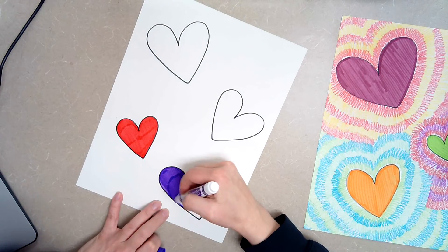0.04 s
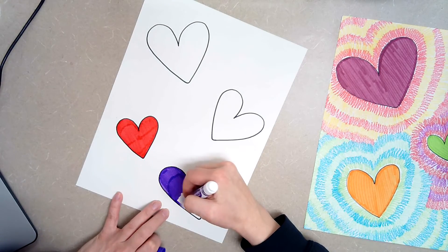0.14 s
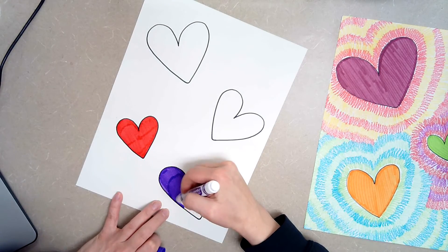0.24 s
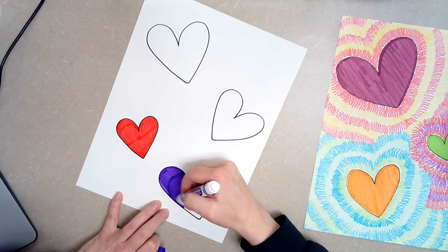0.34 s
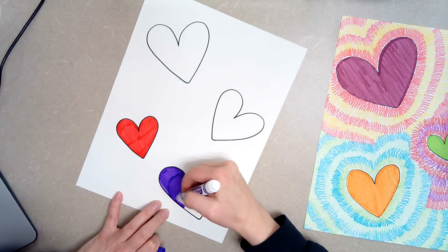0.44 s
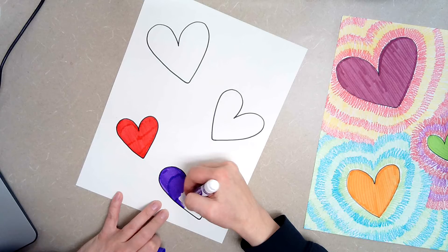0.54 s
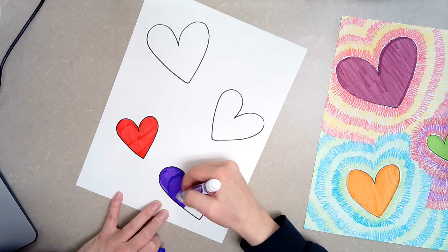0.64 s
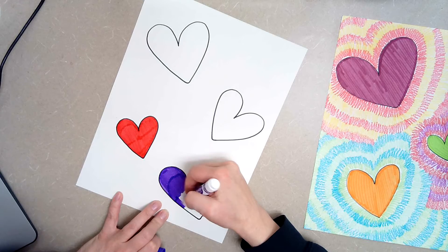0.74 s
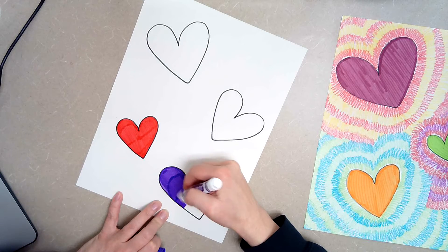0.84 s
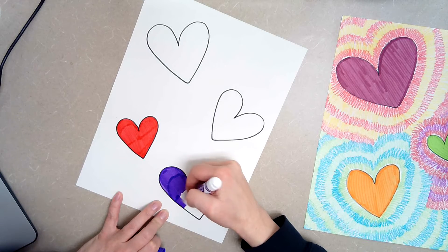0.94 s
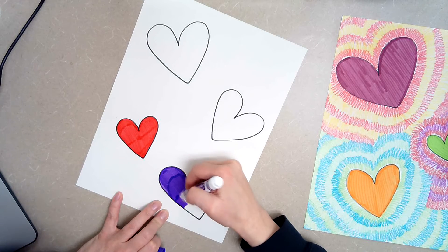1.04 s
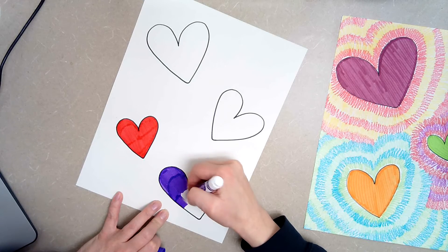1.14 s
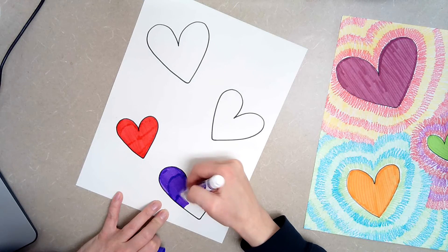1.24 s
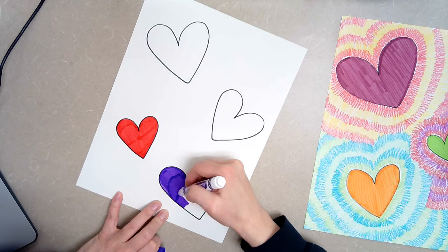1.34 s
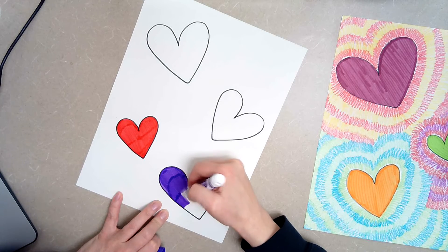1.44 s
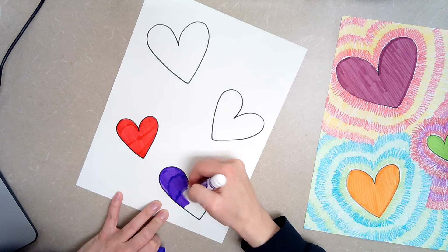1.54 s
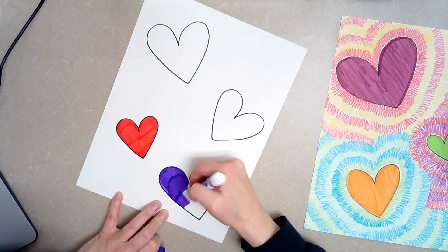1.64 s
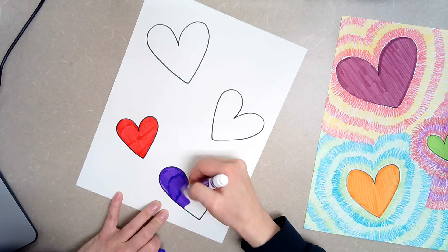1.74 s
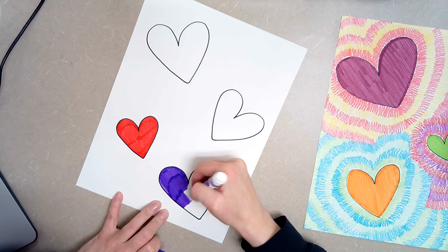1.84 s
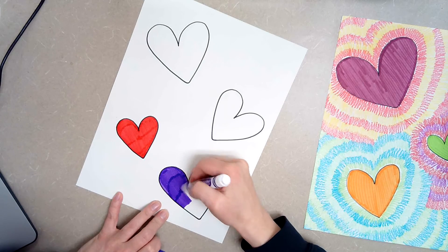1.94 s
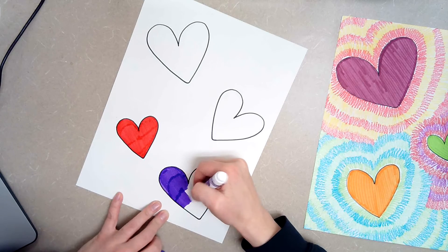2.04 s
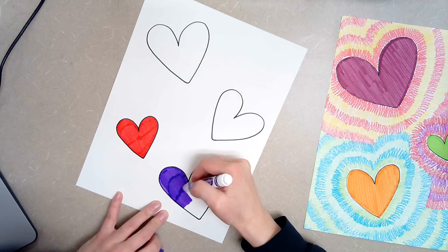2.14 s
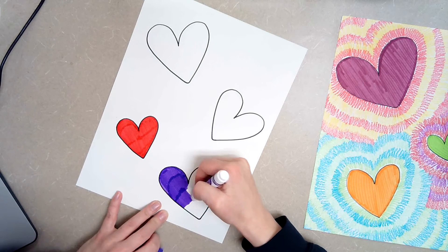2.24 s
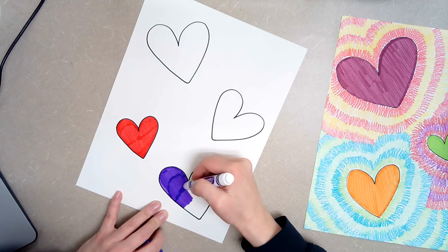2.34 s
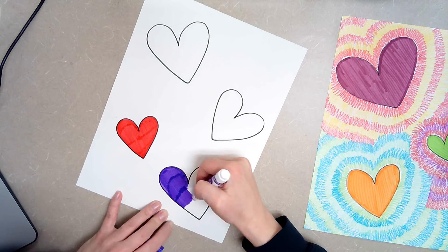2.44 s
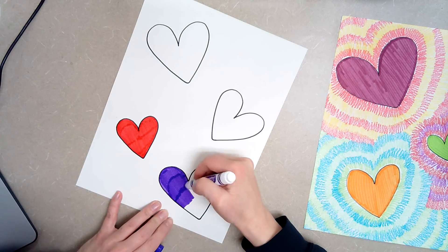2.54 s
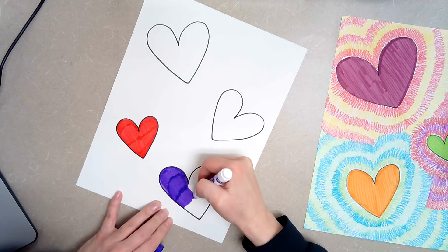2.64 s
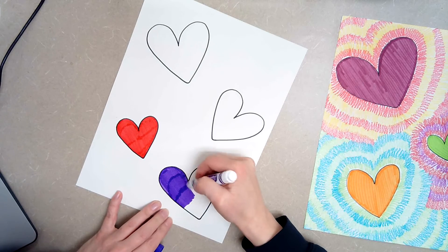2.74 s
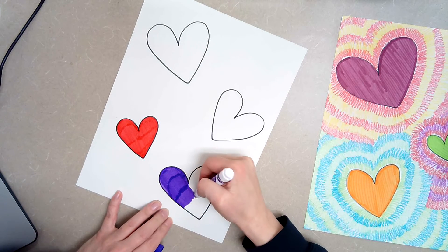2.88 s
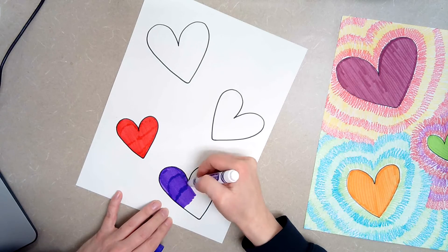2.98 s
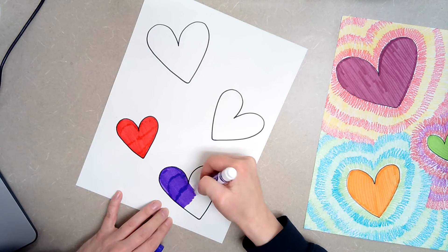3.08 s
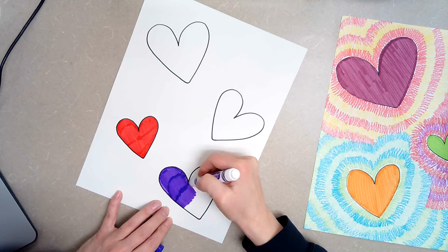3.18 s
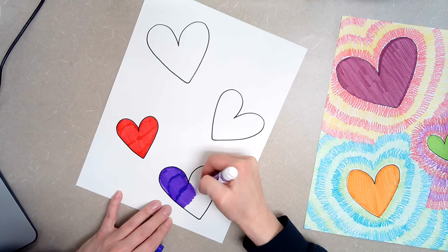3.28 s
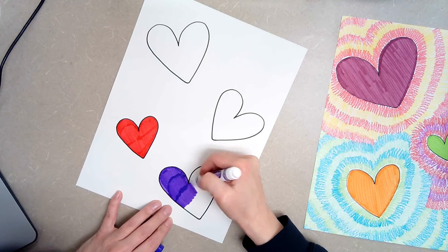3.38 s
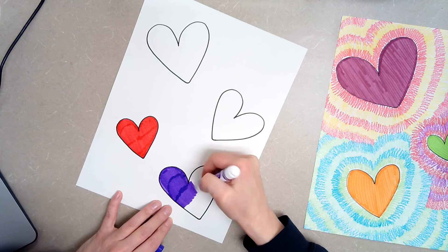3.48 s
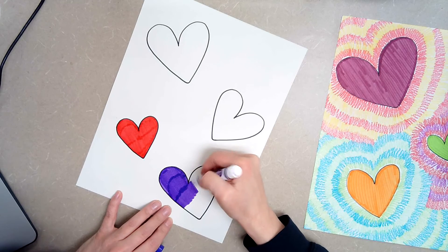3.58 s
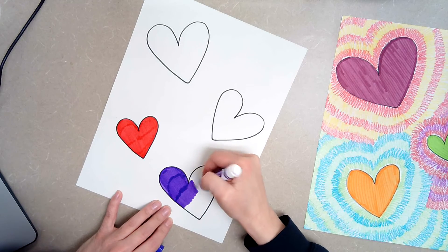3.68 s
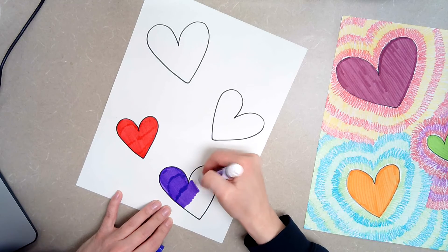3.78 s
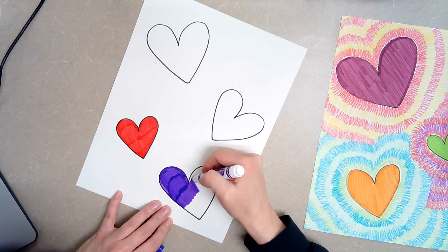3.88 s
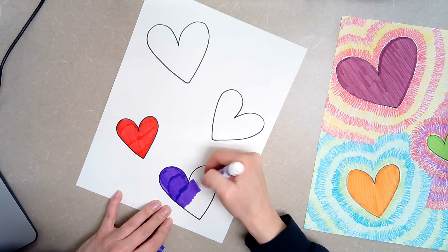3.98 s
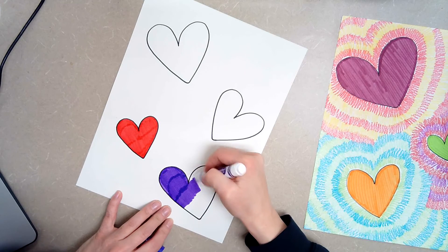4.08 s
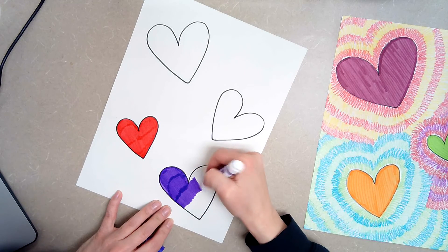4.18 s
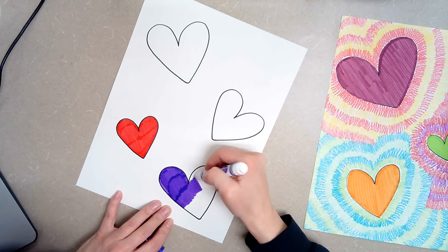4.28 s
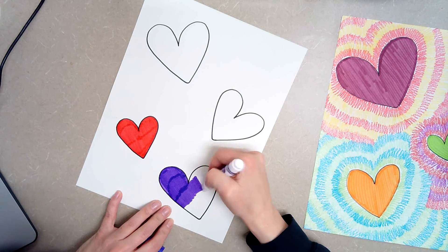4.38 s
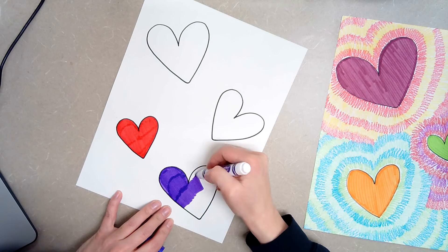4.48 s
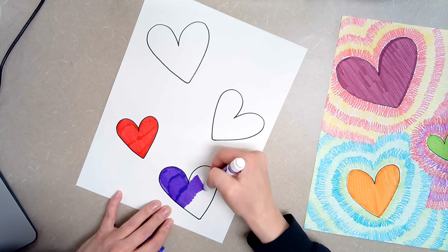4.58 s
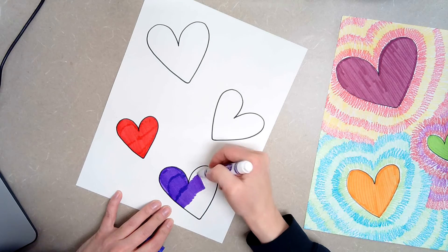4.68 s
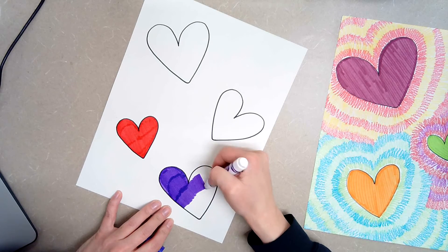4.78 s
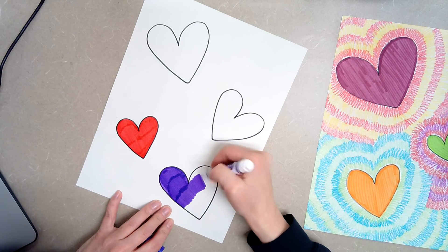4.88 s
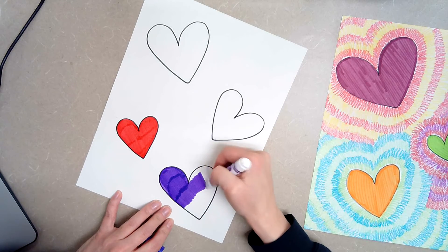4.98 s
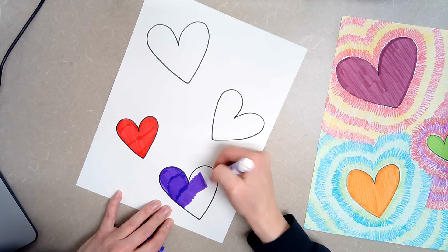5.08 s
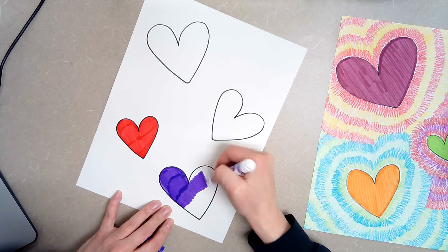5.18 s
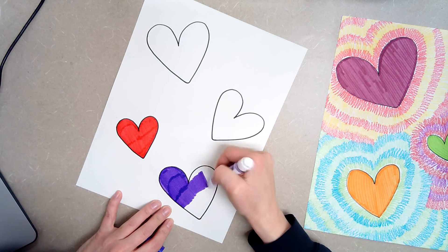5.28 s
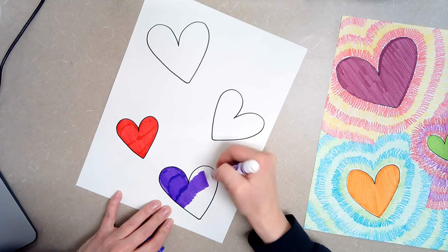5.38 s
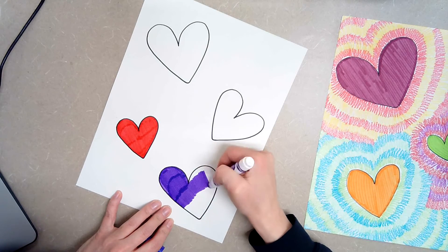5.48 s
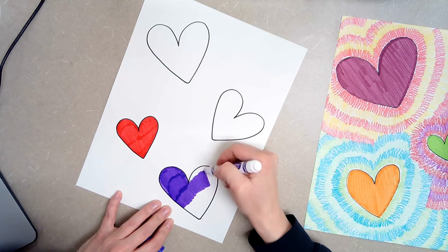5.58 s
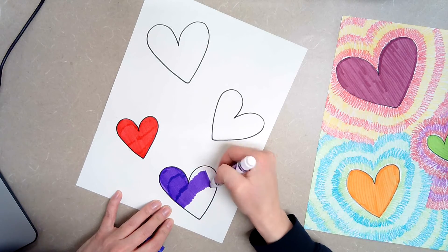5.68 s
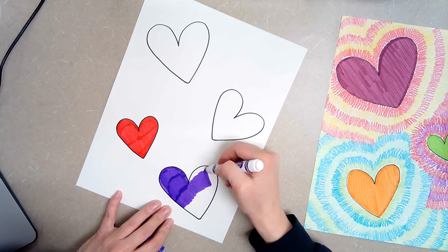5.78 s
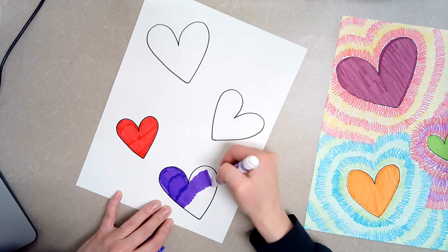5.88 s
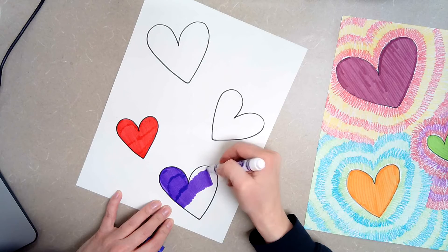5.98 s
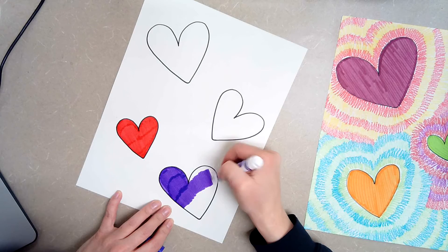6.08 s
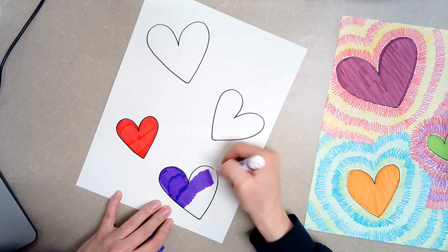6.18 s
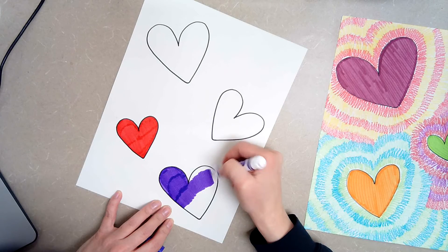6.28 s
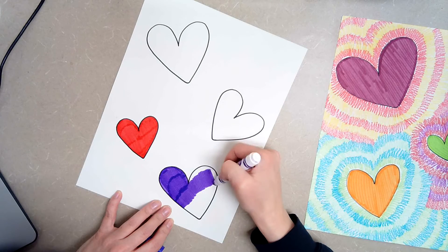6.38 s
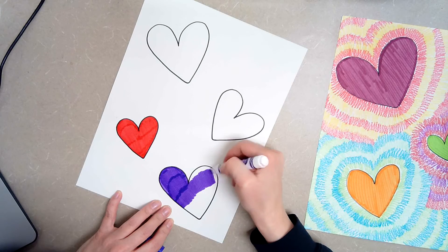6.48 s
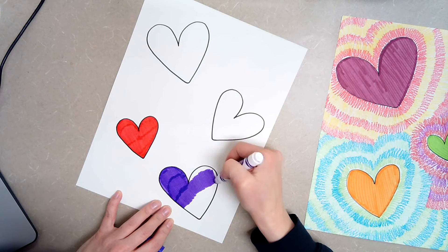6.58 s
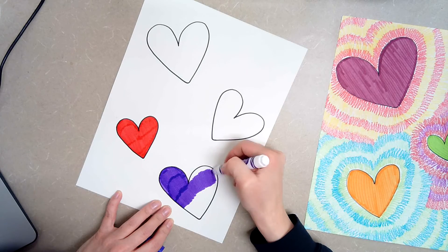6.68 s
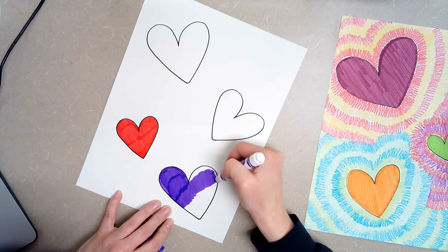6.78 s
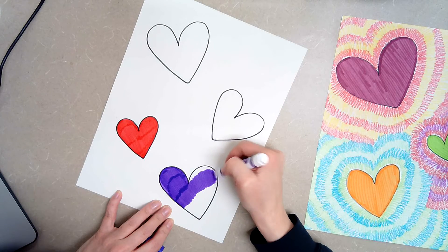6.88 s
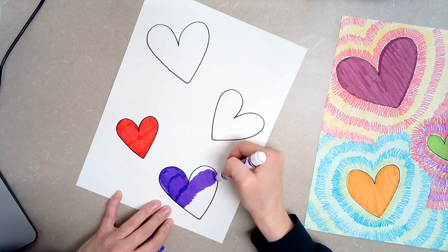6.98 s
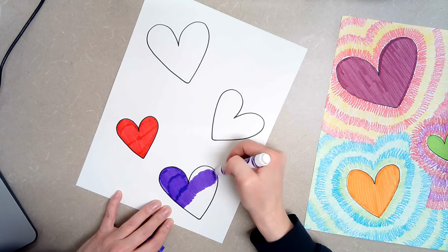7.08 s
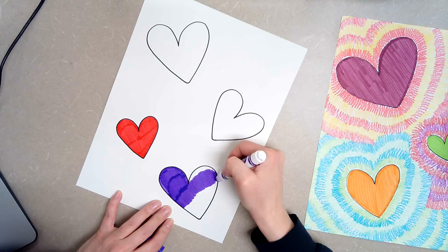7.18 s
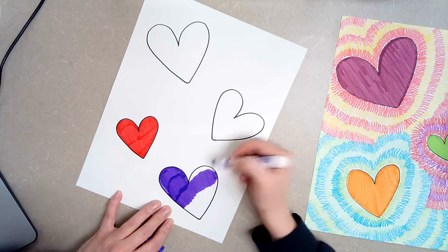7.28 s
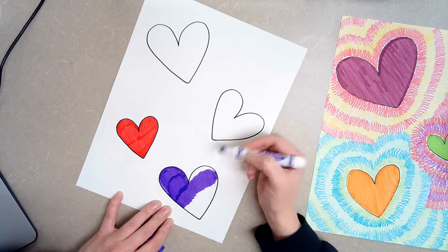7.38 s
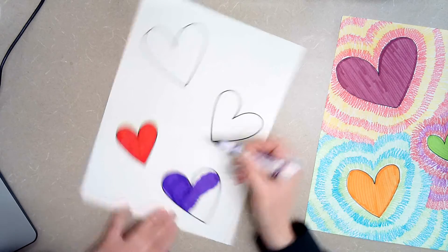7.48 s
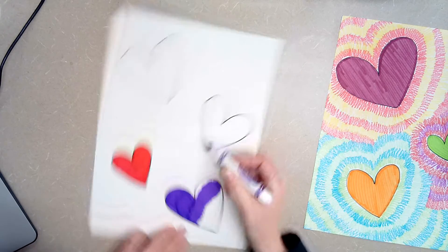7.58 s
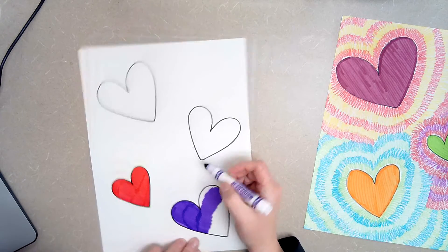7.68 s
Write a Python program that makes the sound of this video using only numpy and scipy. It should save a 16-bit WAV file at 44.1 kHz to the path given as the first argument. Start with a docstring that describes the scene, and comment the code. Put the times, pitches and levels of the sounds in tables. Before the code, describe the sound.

Close up in a quiet room, a felt-tip marker colours in a shape on paper with steady push-and-pull strokes, about five pairs a second, bright, dry and slightly squeaky. The hand rubs the sheet dully and now and then bumps the desk with a soft low tone. The strokes weaken and stop near seven seconds, then the paper slides with a sharp, swelling swish at the very end.

```python
"""In a quiet room a felt-tip marker colours in a shape on a sheet of paper on a desk.
About five push-and-pull pairs of strokes a second catch on the fibres: noise rings in the plastic barrel.
The hand rubs the sheet with dull noise and bumps the desk, which answers with a low, dying tone.
The strokes fade and stop, then the sheet is pulled across the desk with a sharp swish of swelling noise."""
import sys
import numpy as np
from scipy import signal
from scipy.fft import rfft, irfft, next_fast_len
from scipy.io import wavfile
from scipy.ndimage import uniform_filter1d, map_coordinates

SR = 44100
rng = np.random.default_rng(int(sys.argv[2]) if len(sys.argv) > 2 else 0)


def to_wav(s):
    """Save 16-bit WAV."""
    ch = np.atleast_2d(s).T  # columns
    pcm = np.round(np.clip(ch, -1, 1) * 32767)  # PCM
    wavfile.write(sys.argv[1], SR, pcm.astype(np.int16))


N = 340804

# pen strokes, by turns push and pull: start t/s, length/s, base level/dB
STROKES = [(0.062, 0.048, -53), (.138, 0.072, -59.5), (.262, 0.052, -50), (0.343, 0.065, -53),
           (.461, 0.06, -47), (.545, .056, -54.5), (.671, 0.052, -46), (0.748, 0.055, -53),
           (0.869, 0.053, -46.5), (.95, 0.061, -55.5), (1.071, 0.053, -44.5), (1.151, 0.066, -52),
           (1.272, 0.056, -47.5), (1.36, .062, -51), (1.474, 0.057, -47), (1.563, 0.068, -53),
           (1.682, 0.058, -45.5), (1.769, 0.066, -49.5), (1.89, .06, -47.5), (1.978, .065, -51),
           (2.093, 0.063, -46.5), (2.186, 0.071, -51), (2.305, 0.061, -46), (2.4, 0.064, -51),
           (2.514, 0.065, -47), (2.603, 0.067, -51), (2.722, 0.065, -45.5), (2.814, 0.067, -48.5),
           (2.937, 0.058, -43.5), (3.024, 0.0741, -51.5), (3.15, 0.068, -45), (3.243, .074, -53),
           (3.376, 0.054, -48), (3.458, .064, -53.5), (3.578, 0.059, -46.5), (3.671, 0.068, -54),
           (3.788, 0.06, -45.5), (3.877, 0.067, -49.5), (3.995, 0.059, -44), (4.086, 0.071, -51.5),
           (4.2, 0.064, -45.5), (4.296, 0.068, -50), (4.413, 0.065, -46.5), (4.517, 0.07, -52),
           (4.632, .061, -47), (4.731, 0.068, -50.5), (4.845, 0.066, -46), (4.951, .068, -52.5),
           (5.066, 0.064, -47.5), (5.171, .067, -55), (5.289, .063, -48.5), (5.39, 0.068, -53),
           (5.505, 0.065, -49), (5.611, 0.072, -56.5), (5.729, 0.063, -49.5), (5.833, 0.07, -53),
           (5.948, .058, -47), (6.047, 0.07, -52.5), (6.166, 0.064, -48), (6.27, 0.071, -56),
           (6.396, 0.058, -50.5), (6.493, 0.066, -54.5), (6.621, .058, -49), (6.715, 0.058, -54.5),
           (6.828, .057, -51), (6.92, 0.049, -63), (7.039, .047, -56), (7.125, 0.045, -71),
           (7.235, 0.051, -70.5), (7.326, 0.039, -70)]
# slow change of colour as the pen crosses the shape:
# t/s, fizz level against the rasp/dB, nib chatter level against the rasp/dB, middle of the nib pitch f/Hz
COLOUR = [(.15, -20, -33, 1940), (.5, -19.5, -24, 1994), (.8, -9.5, -14.5, 2050), (1.15, -9, -21.5, 2163),
          (1.9, -6.5, -17.5, 2152), (2.9, -10, -17, 2135), (3.3, -13, -24.5, 2235), (4.3, -7, -18.5, 2272),
          (5.1, -3.5, -19, 2526), (5.9, -3.5, -11, 2495), (6.6, -1.5, -8, 2510), (6.85, -8.5, -11.5, 2350),
          (7.07, -12, -11, 2384), (7.14, -6, -6, 2355), (7.35, -11, 1.5, 2424)]
# the hand rocks against the desk: t/s, base level/dB
BUMPS = [(0.139, -57.5), (.285, -60), (0.727, -57.5), (.869, -61), (1.338, -56.5), (1.573, -61.5),
         (1.899, -59.5), (2.368, -64), (2.739, -60), (2.899, -57), (3.02, -62), (3.26, -63), (3.417, -62.5),
         (3.689, -54), (4.242, -56), (4.647, -61), (4.958, -59.5), (5.448, -62.5), (6.249, -56),
         (6.507, -62.5)]
DESK_HZ = 133.7  # the lowest mode of the desk top, about which the bumps scatter
LEAD_S = 0.0077  # the nib starts to creep just before a stroke
TAIL_T60 = 0.19  # seconds in which the faint ringing after a stroke falls by 60 dB


def amp(db):
    """Turn decibels into a gain."""
    return 10 ** (np.asarray(db) / 20)


def unit(x):
    """Scale to an rms (average strength) of 1."""
    return x / np.sqrt(np.mean(x ** 2) + 1e-20)


def clock():
    """The time of each sample in seconds."""
    return np.arange(N) / SR


def curves(rows):
    """Join the points of a table by straight lines: one curve for each column after the time."""
    times, *columns = np.transpose(rows)
    return [np.interp(clock(), times, column) for column in columns]


def wobble(rate):
    """A smooth random curve through `rate` random points a second."""
    points = rng.standard_normal(int(N * rate / SR) + 4)
    return map_coordinates(points, [clock() * rate], order=2)


def filtered(x, response):
    """Multiply each frequency of x by response(frequency)."""
    size = next_fast_len(N + 8192)
    hz = np.fft.rfftfreq(size, 1 / SR)
    return irfft(rfft(x, size) * response(hz), size)[:N]


def coloured(x, points):
    """Give x the tone colour drawn by (f/Hz, level/dB) points, at rms 1."""
    f, db = np.transpose(points)
    return unit(filtered(x, lambda hz: amp(np.interp(np.log(hz + 1), np.log(f), db))))


def friction(catch_rate, catch_db):
    """Countless tiny slips, clumped where the fibres catch: noise with a wavering level."""
    return unit(rng.standard_normal(N) * amp(catch_db * wobble(catch_rate)))


def resonance(centre_hz, width_hz):
    """Noise of rms 1 in a steep-sided resonance whose centre may glide."""
    edge_hz = np.clip(width_hz / 2, 2, SR / 4)
    lowpass = signal.butter(3, edge_hz, fs=SR, output="sos")
    a, b = signal.sosfilt(lowpass, rng.standard_normal((2, N)))
    # slow noise on a cosine and a sine sits as a band around their frequency
    phase = 2 * np.pi * np.cumsum(centre_hz * np.ones(N)) / SR
    return unit(a * np.cos(phase) + b * np.sin(phase))


def patchy(x, depth_db, size):
    """Narrow ridges come and go in the spectrum as the contact point moves; the total power stays even."""
    spectrum = signal.stft(x, nperseg=size)[2]
    field = uniform_filter1d(rng.standard_normal(spectrum.shape), size=3, axis=0)
    field = uniform_filter1d(field, size=5, axis=1)
    spectrum = spectrum * amp(depth_db * np.tanh(unit(field)))
    even = spectrum / (np.linalg.norm(spectrum, axis=0) + 1e-9)
    return unit(signal.istft(even, nperseg=size)[1][:N])


def room_hush():
    """The quiet room: steady, faint, coloured noise."""
    # tone colour of the room: f/Hz, level/dB
    room_colour = [(20, -22), (35, -1.5), (55, -15), (130, 4), (300, -14), (600, -15), (1400, -16.5),
                   (2400, -19), (4500, -30), (7000, -37), (16000, -20)]
    return amp(-80.0) * coloured(rng.standard_normal(N), room_colour)


def hand_speed():
    """Speed of the hand: 0 at the turns, 1 in the middle of each stroke."""
    lag_s = 0.015  # the hand trails the nib
    rows = []
    for start, length, _ in STROKES:
        rows += [(start, 0), (start + length / 2, 1), (start + length, 0)]
    return np.sin(np.pi / 2 * curves(np.add(rows, [lag_s, 0]))[0])


def rocking(rise_s):
    """A soft swell of pressure with each bump of the hand, at its peak after rise_s."""
    gain, u = np.zeros(N + SR), np.arange(SR // 4) / SR / rise_s
    for start, db in BUMPS:
        gain[round(start * SR):][:len(u)] += amp(db) * u ** 2 * np.exp(2 * (1 - u))
    return gain[:N]


def hand():
    """Skin and pen rub the sheet dully and keep the desk top humming."""
    # weight of the hand on the sheet: t/s, base level of the low rub/dB, base level of the scuff/dB
    weight = [(0, -78.5, -78.5), (.5, -70, -70.5), (2.9, -71.5, -73.5), (3.3, -74, -76.5),
              (4.3, -72.5, -76), (5.3, -77, -78), (6.4, -74.5, -76.5), (7.37, -78.5, -80.5),
              (7.58, -88.5, -91.5)]
    # tone colour of the low rub: f/Hz, level/dB
    rub_colour = [(40, -31), (100, -3.5), (200, 2), (320, 2), (480, -10), (800, -27.5), (2000, -73)]
    # tone colour of the scuff: f/Hz, level/dB
    scuff_colour = [(250, -14.5), (500, -2), (700, -4.5), (950, 0), (1450, -8.5), (1750, 0), (2500, -4),
                    (3400, -4.5), (6000, -18.5), (15000, -31)]
    rest_db = -2.5  # the rub drops at each turn
    waver_db = 1.1  # the hand slides unevenly
    rub_db, scuff_db = curves(weight) + rest_db * (1 - hand_speed()) + waver_db * wobble(9)

    rub = patchy(friction(catch_rate=60, catch_db=1.0), depth_db=8.5, size=1536)
    rub = amp(rub_db + 0.16) * coloured(rub, rub_colour)
    scuff = patchy(friction(catch_rate=160, catch_db=0.1), depth_db=10.5, size=1024)
    scuff = amp(scuff_db + 3.0) * coloured(scuff, scuff_colour)
    hum = amp(rub_db - 1.0) * resonance(DESK_HZ, width_hz=20)
    # the hand scrubs harder as it rocks
    scrub = amp(-11) * rocking(rise_s=0.03) * resonance(155, width_hz=130)
    return rub + scuff + hum + scrub


def envelope(t, length, attack_s, peak_at, sag_db, t60):
    """One stroke: a quick attack, an arched hold, a fast release and a faint tail."""
    brake_s = 0.0037  # the nib slows just before the end
    tail_db = -18.5  # what rings on after a stroke
    rise = np.clip((t + LEAD_S) / attack_s, 0, 1) ** 2
    arch = amp(-sag_db * (np.clip(t / length, 0, 1) - peak_at) ** 2)
    after = np.maximum(t - length + brake_s, 0)
    release = amp(-60 * after / t60)
    tail = amp(tail_db - 60 * after / TAIL_T60)
    return rise * arch * np.maximum(release, tail)


def stroke_gains():
    """Strength of rasp, fizz and nib chatter over time: every stroke swells and dies away."""
    # how a push swells, one row each for rasp, fizz and nib chatter: level added to the stroke/dB, attack/s,
    # place of the peak/share of the stroke, sag one stroke length from the peak/dB, time to fall 60 dB/s
    push_shapes = [(1, 0.011, 0.51, 16.5, 0.054), (5, 0.0097, 0.61, 50.5, 0.055),
                   (-1.5, 0.0065, 0.2, 8.5, 0.057)]
    # how a pull swells: the same rows and columns
    pull_shapes = [(2, 0.016, .55, 21.5, 0.05), (5, 0.015, 0.25, 33.7, 0.087),
                   (10.5, 0.008, 0.95, 30, 0.053)]
    t, gains = clock(), np.zeros((3, N))
    for k, (start, length, db) in enumerate(STROKES):
        a, b = np.searchsorted(t, [start - LEAD_S, start + length + TAIL_T60])
        shapes = pull_shapes if k % 2 else push_shapes
        for gain, (peak_db, *shape) in zip(gains, shapes):
            gain[a:b] += amp(db + peak_db) * envelope(t[a:b] - start, length, *shape)
    rasp, fizz, nib = gains
    fizz_db, nib_db, _ = curves(COLOUR)
    return rasp, fizz * amp(fizz_db), nib * amp(nib_db)


def stroke_controls():
    """Direction (1 = pull), lean of the pen (-1 near, 1 far), rasp tilt and shift of the resonances."""
    # base tilt of the rasp: t/s, tilt in a push/(dB per kHz), tilt in a pull/(dB per kHz)
    rasp_tilt = [(.25, 4, 4), (.7, -15, 7.5), (1.27, -11, -6), (1.5, -6, -1.5), (2.9, 0.5, -10),
                 (3.5, -4.5, -6), (3.9, 1.5, -9), (5.6, 5.5, -3.5), (6.2, 0, -3)]
    # no two strokes meet the paper alike
    bend_share, tilt_db = 0.006, 1  # scatter of the resonances (share) and of the tilt (dB per kHz)
    rows, chance = [], rng.standard_normal((len(STROKES), 2))
    for k, (start, length, _) in enumerate(STROKES):
        end_lean = (-1) ** k
        rows.append((start, k % 2, -end_lean, *chance[k]))
        rows.append((start + length, k % 2, end_lean, *chance[k]))
    pulling, lean, tilt_scatter, bend_scatter = curves(rows)
    push_tilt, pull_tilt = curves(rasp_tilt)
    tilt = push_tilt + pulling * (pull_tilt - push_tilt) + tilt_db * tilt_scatter
    return pulling, lean, tilt, bend_share * bend_scatter


def bite(rise_s, t60):
    """The felt sticks at the turn and breaks free abruptly as each pull begins."""
    gain, t = np.zeros(N + SR), np.arange(SR // 10) / SR
    shape = (1 - np.exp(-t / rise_s)) * amp(-60 * t / t60)
    for start, _, db in STROKES[1::2]:
        gain[round(start * SR):][:len(t)] += amp(db) * shape
    return gain[:N]


def snags():
    """The nib snags on the paper: brief jumps of the friction force."""
    # the snags: middle t/s, extra level/dB
    snag_points = [(.713, 8.5), (1.322, 5), (2.77, 4.5), (3.838, 4)]
    half_s = 0.004  # about half the length of a snag
    t = clock()
    extra_db = 0
    for middle, db in snag_points:
        extra_db = extra_db + db * np.exp(-np.minimum(((t - middle) / half_s) ** 2, 20))
    return amp(extra_db)


def barrel(modes, grip, pulling, bend, tilt):
    """Grip, direction and tilt share the energy out among the resonances; bend shifts them all."""
    sound, power = np.zeros(N), np.zeros(N)
    for hz, width, left_db, middle_db, right_db, pull_db in modes:
        db = np.interp(grip, np.arange(3), [left_db, middle_db, right_db]) + pull_db * pulling
        gain = np.sqrt(width) * amp(db + tilt * hz / 1000)
        sound += gain * resonance(hz * bend, width)
        power += gain ** 2
    return sound / np.sqrt(power)


def marker():
    """Each stroke drags the nib over the fibres; the resonances glide as the pen leans to and fro."""
    # the wrist turns the pen as it crosses the shape: t/s, grip (0 left, 1 middle, 2 right)
    grip_path = [(.6, 0.27), (1.4, 0.79), (2.6, 1.155), (4.3, 1.56), (5.4, 1.67), (6.1, 2.74)]
    # barrel resonances of the rasp: middle f/Hz, width/Hz, relative level at left, middle
    # and right grip/dB (three columns), extra level when pulling/dB
    rasp_modes = [(3468, 200, -7, -25.5, -11, 4.5), (4116, 548, 4, 9, 4, 3.5), (4250, 365, 2, 4.5, -9, 8.5),
                  (4493, 404, 5, 8.5, 2.5, -0.5), (5122, 457, -4, -5.5, -8, 11),
                  (5703, 240, -60, -32, -25.5, 29.5)]
    # higher barrel resonances of the fizz: the same columns
    fizz_modes = [(7163, 543, -51, -10.5, -2, -6), (8310, 2100, -29, -17.5, -17.5, -6.5),
                  (9800, 650, -17, -24, -23, 4.5), (11010, 695, 0, 7.5, -12.5, -5.5),
                  (11160, 340, 3.5, -4.5, -26.5, 11), (12450, 470, 14.5, -1, -9, 3.5),
                  (13140, 370, 2, -1, 3, -4), (14560, 490, 10, 4, 2.5, 0.5), (14710, 650, -22, 7, 0.5, -4),
                  (15500, 320, 3, -12, -9, -10)]
    # tone colour of the sheet itself under the nib: f/Hz, level/dB
    paper_colour = [(400, -15.5), (950, -14), (1430, -17.5), (1720, -2), (2300, -3), (2650, -5), (2950, -1),
                    (3200, -7.5), (5000, 2), (6300, -18), (15000, -26)]
    force, fizz_gain, nib_gain = stroke_gains()
    pulling, lean, tilt, shift = stroke_controls()
    *_, nib_hz = curves(COLOUR)
    grip, = curves(grip_path)
    release = bite(rise_s=0.0015, t60=0.11)

    # on the left the hand bears down at the far end of a stroke, on the right at the near end
    force = force * snags() * amp(lean * (3.5 - 2.3 * grip))
    # the rasp grows brighter as each stroke runs on
    tilt = tilt + 1.8 * lean * (1 - 2 * pulling)
    bend = 1 + shift + 0.016 * lean + 0.0043 * wobble(14)
    rasp = patchy(barrel(rasp_modes, grip, pulling, bend, tilt), depth_db=9.0, size=768)
    rasp = amp(-0.54) * force * rasp
    squeak = amp(-1.5) * release * resonance(4170 * bend, width_hz=117)

    # the fizz shifts with the lean and lies lowest at mid-stroke
    fizz_bend = 1 + shift + 0.006 * lean + 0.018 * (lean ** 2 - 0.5) + 0.005 * wobble(35)
    fizz = patchy(barrel(fizz_modes, grip, pulling, fizz_bend, 0), depth_db=7.5, size=512)
    fizz = (amp(-2.1) * fizz_gain + amp(-10.5) * release) * fizz

    # the nib chatters more in some strokes than in others
    nib_pitch = nib_hz * (1 + 0.055 * (lean + 0.3) + 0.018 * wobble(12))
    chatter = amp(-2.34 + 2.5 * wobble(9)) * nib_gain * resonance(nib_pitch, width_hz=290)

    # the sheet speaks most on the left of the shape and in the pulls
    paper = coloured(patchy(rng.standard_normal(N), depth_db=15, size=1024), paper_colour)
    paper = amp(-16.0 - 2.78 * grip + 5.0 * pulling) * force * paper

    # the pressure wavers and single fibres catch the felt
    grain = unit(amp(1.25 * wobble(80) + 1.36 * wobble(700)))
    return grain * (rasp + squeak + fizz + chatter + paper)


def desk(push_s, t60, thud_s):
    """Soft bumps give a low push and swell the lowest mode of the desk top, which then dies away."""
    out, t = np.zeros(N + SR), np.arange(SR // 3) / SR
    swell = np.sin(np.pi / 2 * np.minimum(t / push_s, 1)) ** 2
    shape = swell * amp(-60 * np.maximum(t - push_s, 0) / t60)
    u = (t - push_s) / thud_s
    thud = amp(-9.5) * u * np.exp(-u ** 2)
    for (start, db), detune in zip(BUMPS, rng.standard_normal(len(BUMPS))):
        ring = shape * np.sin(2 * np.pi * DESK_HZ * (1 + 0.036 * detune) * t)
        out[max(round(start * SR), 0):][:len(t)] += amp(db + 0.2) * (ring + thud)
    return out[:N]


def sheet():
    """The paper starts to slide over the desk and its hiss of tiny slips swells as it gains speed."""
    # the slide: t/s, level/dB
    slide_level = [(7.59, -110), (7.606, -76), (7.62, -82), (7.657, -80), (7.668, -55), (7.683, -40),
                   (7.705, -35.5), (7.718, -32.5), (7.723, -28)]
    # tone colour of the sliding sheet: f/Hz, level/dB
    slide_colour = [(150, -34), (800, -37), (2950, -31), (3500, -10.5), (5200, -12.5), (6300, -24.5),
                    (7000, -14), (7700, -35), (8600, -28), (9300, -14), (13500, -3.5), (14900, -1),
                    (15800, -19.5)]
    level_db, = curves(slide_level)
    slips = friction(catch_rate=900, catch_db=1.7)
    return amp(level_db) * coloured(slips, slide_colour)


def scene():
    """Hand, pen, desk and sheet over the hush of the room, in one channel."""
    bumps = desk(push_s=0.024, t60=0.24, thud_s=0.0027)
    return (room_hush() + hand() + marker() + bumps + sheet())[None]


def record(dry):
    """Cut off steeply everything above the band limit."""
    top_hz = 15850
    roll_off = lambda hz: 1 / (1 + (hz / top_hz) ** 400)
    return np.array([filtered(channel, roll_off) for channel in dry])


dry = scene()
out = record(dry)
to_wav(out)
```